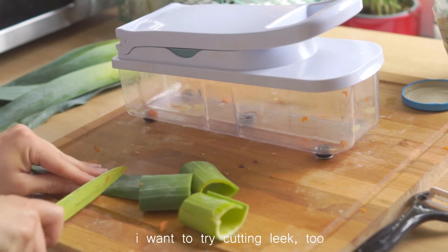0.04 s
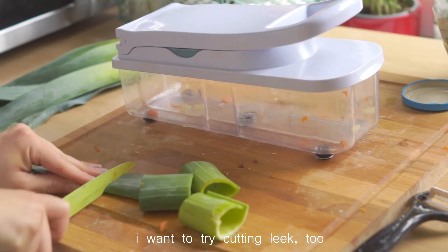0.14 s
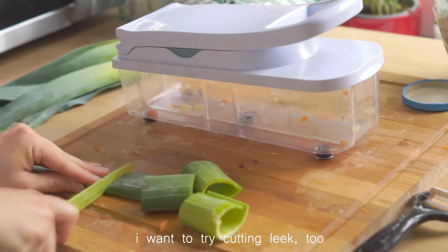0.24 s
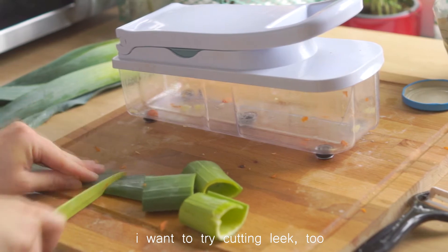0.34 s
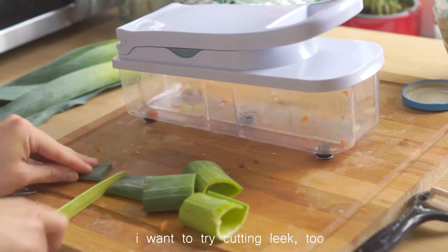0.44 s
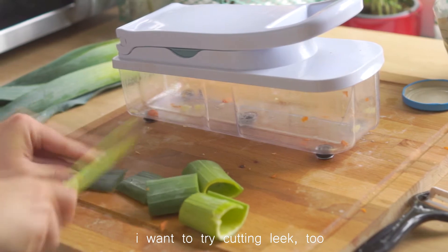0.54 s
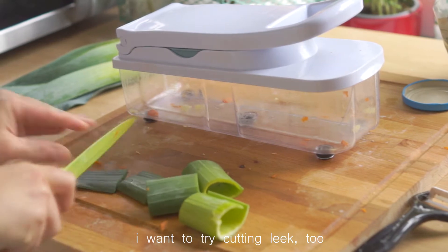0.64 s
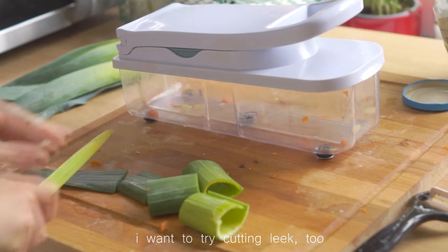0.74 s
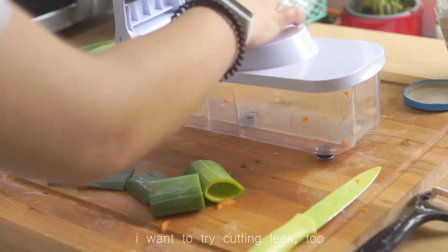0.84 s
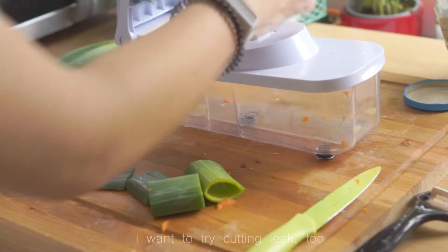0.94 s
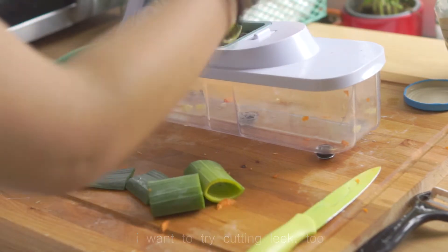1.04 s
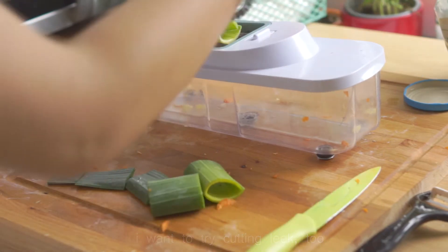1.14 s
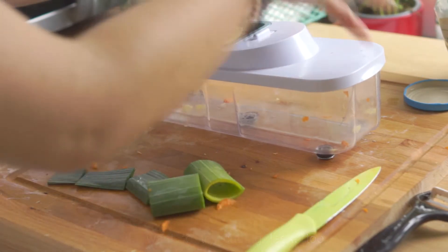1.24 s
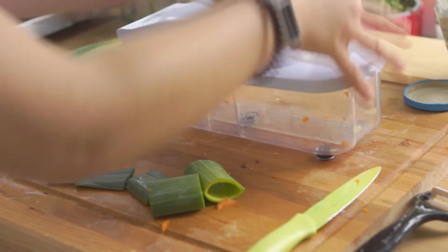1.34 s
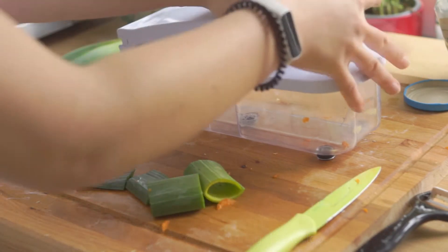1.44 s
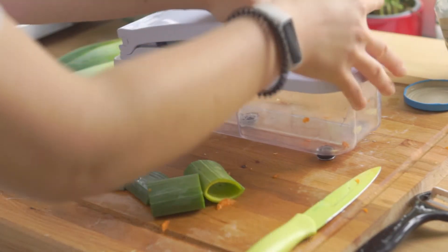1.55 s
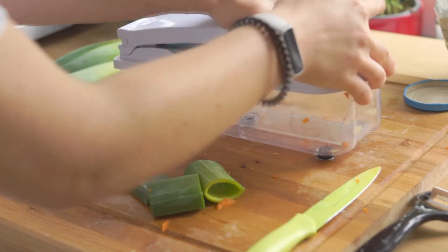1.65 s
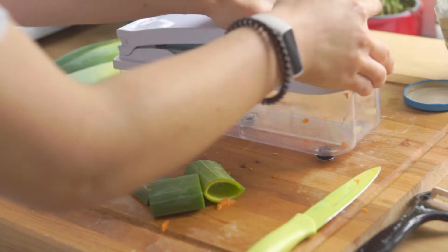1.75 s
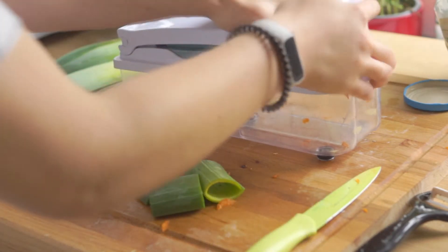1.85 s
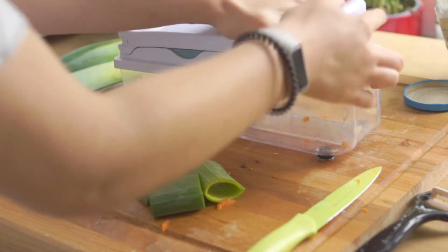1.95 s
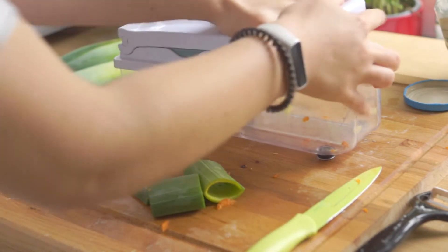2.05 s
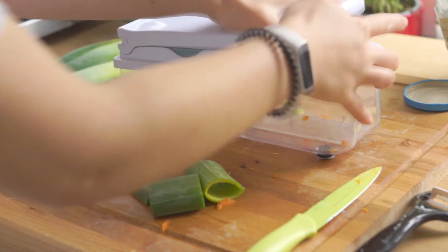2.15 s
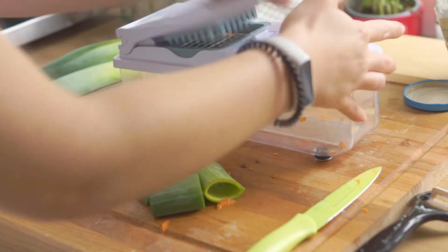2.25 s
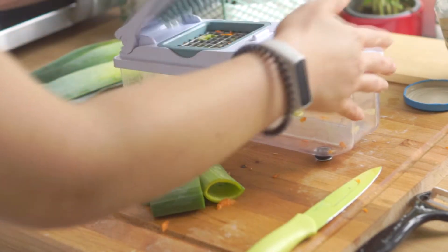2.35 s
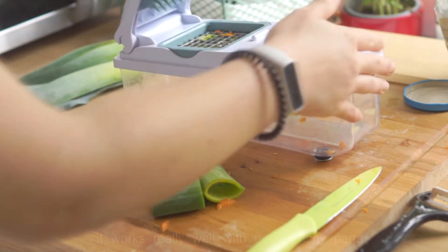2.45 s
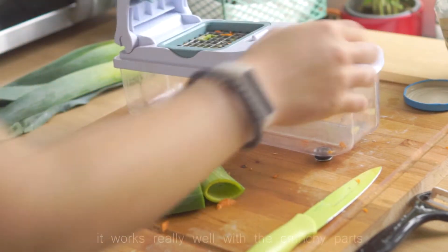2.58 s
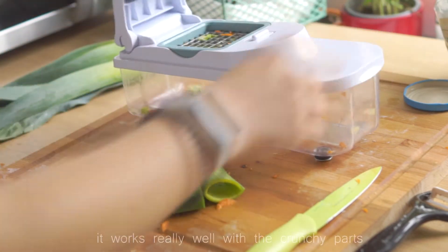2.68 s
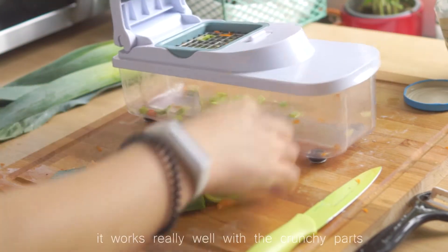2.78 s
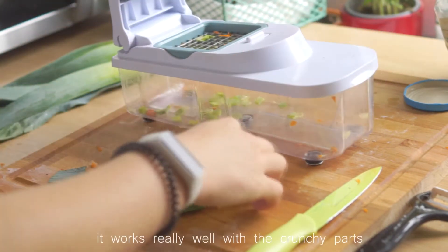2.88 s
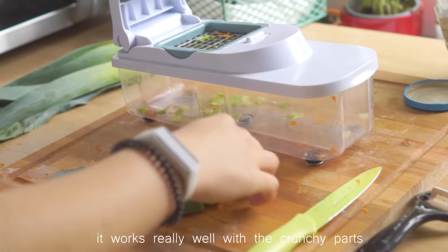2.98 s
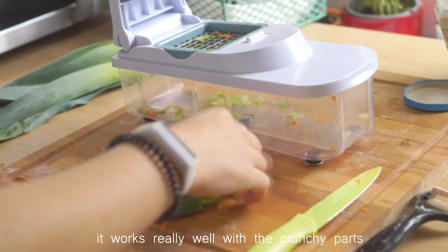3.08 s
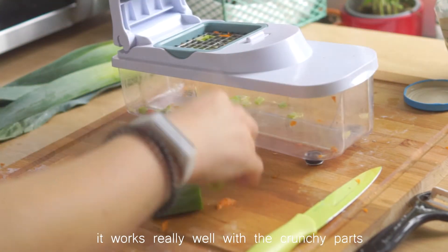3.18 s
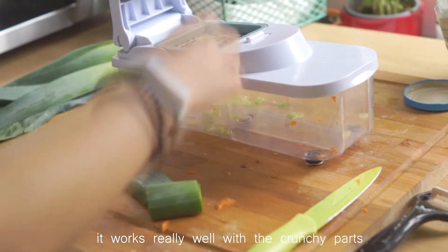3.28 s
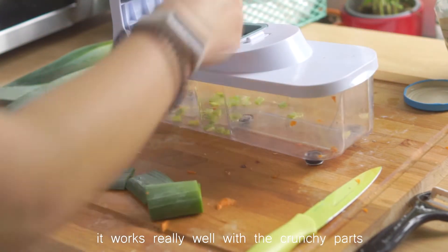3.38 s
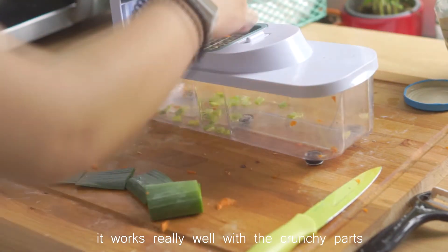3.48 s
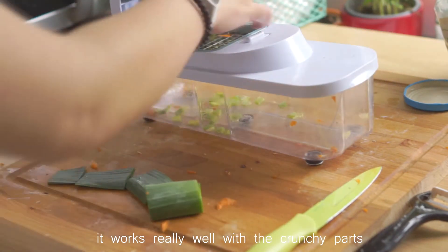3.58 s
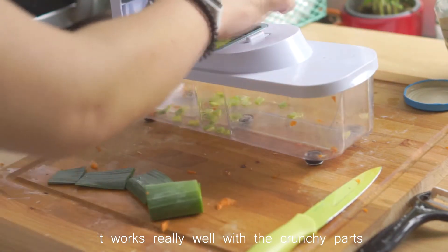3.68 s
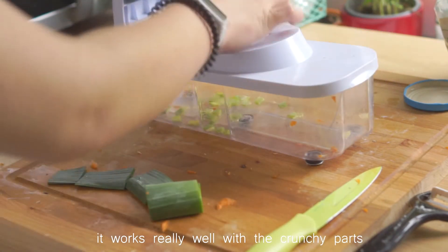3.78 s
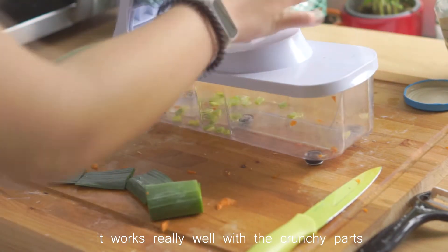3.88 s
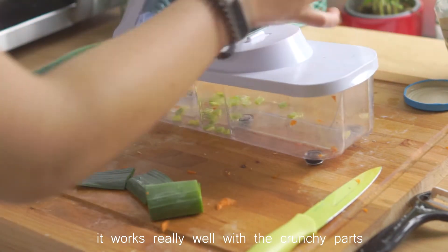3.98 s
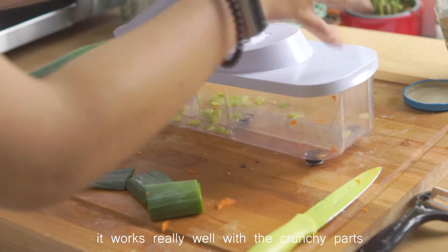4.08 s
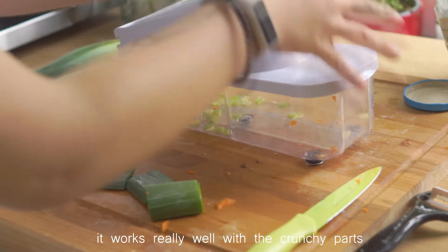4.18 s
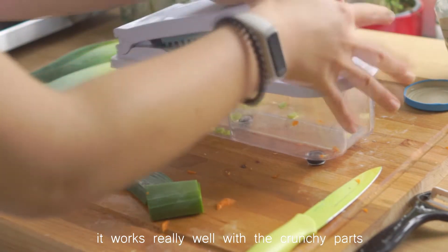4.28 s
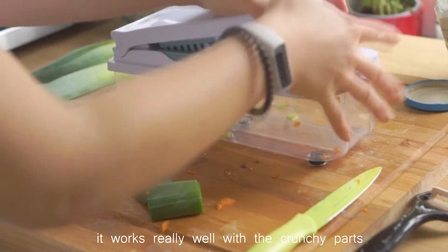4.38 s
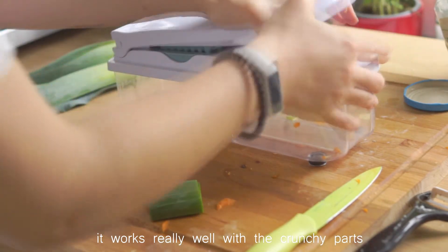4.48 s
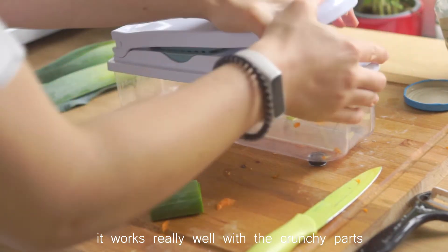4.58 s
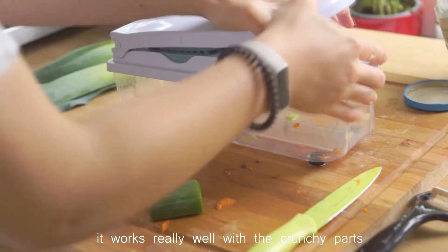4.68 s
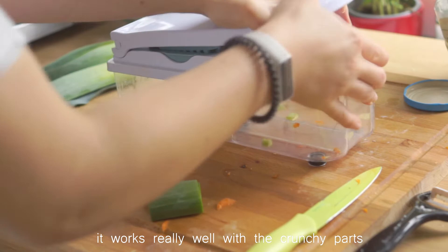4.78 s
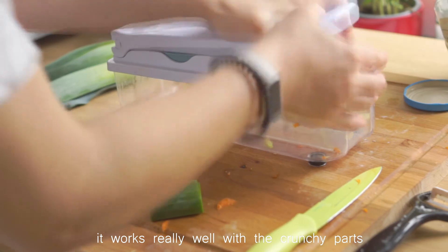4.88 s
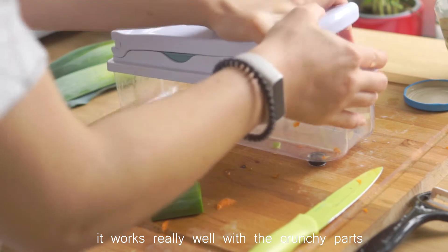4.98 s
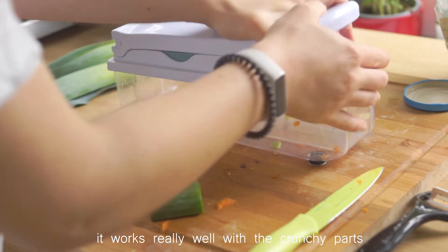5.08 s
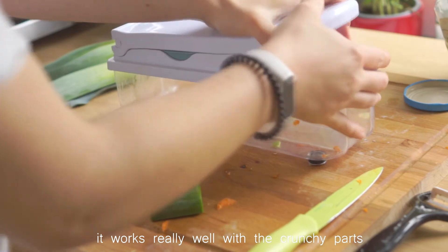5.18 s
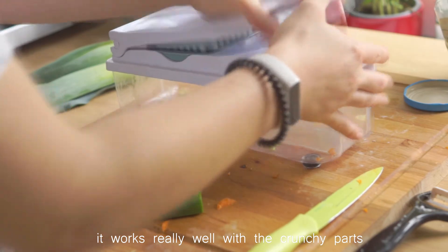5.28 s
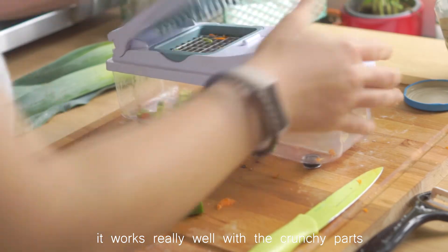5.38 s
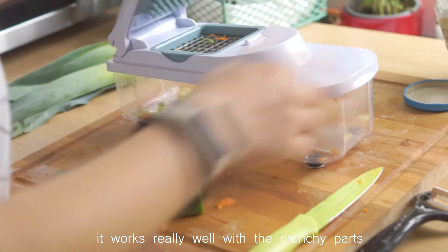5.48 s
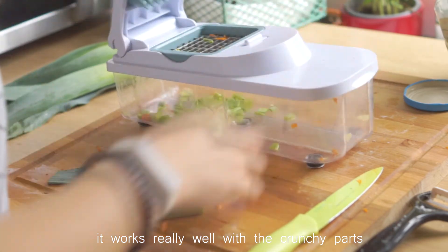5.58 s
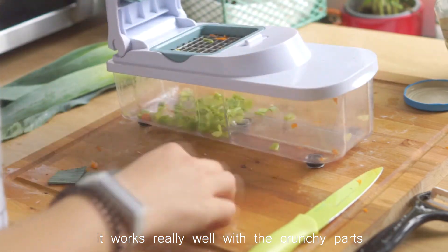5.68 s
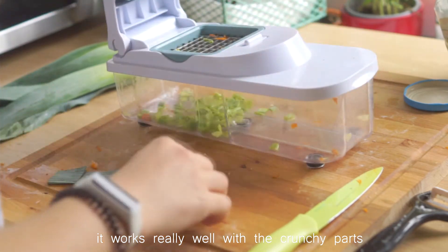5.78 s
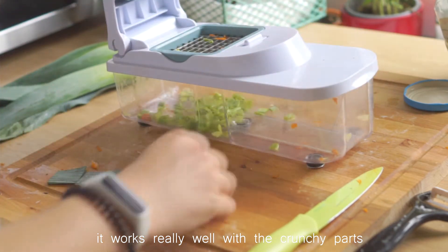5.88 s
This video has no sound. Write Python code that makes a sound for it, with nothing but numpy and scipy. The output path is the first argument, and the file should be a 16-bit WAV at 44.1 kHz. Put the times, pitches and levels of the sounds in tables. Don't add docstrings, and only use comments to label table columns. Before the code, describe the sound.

A close stereo view of a hard-walled kitchen, with quiet room and microphone hiss. From 0 to 0.6 seconds a knife makes faint, thin ticks and scrapes through leek on a wooden board, with one dull brush and tap near 0.1. A light touch comes at 0.9, then a soft slide around 1.2. At 1.35 to 1.7 the dicer presses down: dense, crisp fibre snaps mixed with hollow plastic knocks. At 1.9 the lid slams home with a hard clack, rattling box and a low counter thump, ringing off the walls. Soft taps follow near 2.4, and very faint handling from 3.6 to 4.3. The second press crunches sharply at 4.36 to 4.6, pauses, then slams at 4.91 to 5.05, its crackle lingering slightly longer. Small plastic taps and brushes at 5.4 to 5.5 fade into quiet room tone.

```python
import sys
import numpy as np
from scipy import signal
from scipy.fft import rfft, irfft
from scipy.io import wavfile
from scipy.ndimage import uniform_filter1d

SR = 44100
rng = np.random.default_rng(int(sys.argv[2]) if len(sys.argv) > 2 else 0)


def ratio(d):
    e = np.asarray(d, float) / 20
    return 10 ** e


def store_pcm(level_fs):
    pcm = np.round(np.clip(level_fs, -1, 1) * 32767).astype(np.int16)
    wavfile.write(sys.argv[1], SR, np.atleast_2d(pcm).T)


N = 261513

# frequency in Hz, level in dB.
HISS = [(12, -39), (20, 6), (48, -8.5), (96, 0), (139, 0), (197, -3.5), (286, -4), (393, -7), (461, -22),
        (705, -7), (9800, -17.5), (10600, -124), (11500, -36), (15000, -96), (22000, -120)]
# frequency in Hz, decay t60 in seconds, tail level in dB,
# left-right likeness from 0 to 1.
KITCHEN = [(60, 0.98, -12, 1), (250, 0.12, -3.5, 0.46), (1000, 0.4, -2, 0.18), (4170, 0.43, 0, 0.092),
           (11100, 0.28, -0.5, 0.011)]
# frequency in Hz, level in dB per Hz.
SNAP_SPECTRUM = [(180, -8.5), (300, -20.5), (624, -9.5), (705, -8), (809, -16), (1020, -12), (2780, -14),
                 (10500, -22), (11500, -47), (15000, -92), (22000, -120)]
# frequency in Hz, width in Hz, level in dB.
SHELL_RESONANCES = [(400, 330, -2.5), (720, 15, 3), (1050, 500, -5.5), (1430, 190, -6), (2274, 170, -5),
                    (3840, 2000, -20)]
# frequency in Hz, level in dB, decay t60 in seconds.
BOX_MODES = [(132, 5.5, 0.12), (171, -48, 0.046), (206, -61, 0.084), (249, -22, 0.28), (251.4, 1.5, 0.34),
             (303.7, -3.5, 0.27), (352.8, 5.5, 0.2), (374, 6, 0.051), (404, -0.5, 0.27), (450, -16, 0.11),
             (497, 3, 0.083), (575, -18.5, 0.54), (619, -10, 0.24), (706.5, -3, 0.17), (856, -30, 0.16),
             (846, 7, 0.015), (1008, 9.5, 0.022), (1094, -23, 0.14), (1345, 2.5, 0.053), (1600, -14, 0.036),
             (1480, -73, 0.036)]
# start in seconds, level in dB,
# fall t60 in seconds, strongest pitch in Hz.
FLECKS = [(0.05, -56.5, 0.12, 2270), (0.084, -45, .2, 2700), (0.293, -51.5, 0.062, 2940),
          (0.343, -51.5, 0.094, 9300), (0.348, -61.5, 0.23, 1610), (0.389, -57.5, 0.2, 3200),
          (0.487, -57, 0.18, 3060), (0.569, -62, 0.13, 3500), (3.190, -86, .05, 3500),
          (3.721, -62, .03, 3050), (3.919, -68, 0.28, 1520)]
# start in seconds, level in dB, fall t60 in seconds.
TOUCHES = [
    (0.105, -42.5, 0.08),
    (0.888, -54.5, 0.11),
    (1.216, -56.5, 0.33),
    (2.37, -53, 0.095),
    (2.390, -66, 0.069),
    (3.62, -67, 0.98),
    (4.065, -55, 0.056),
    (5.401, -55, 0.098),
    (5.488, -54, 0.15),
]
# start in seconds, level in dB, rise in seconds,
# fall t60 in seconds, strongest pitch in Hz.
CRUSHES = [(0.072, -35.5, 0.025, 0.026, 5830), (1.313, -45.5, 0.013, 0.3, 1200),
           (1.350, -21, 0.0095, 0.035, 1100), (1.372, -16.5, 0.013, 0.065, 2700),
           (1.403, -23, 0.019, 0.047, 1120), (1.440, -60, 0.011, 0.09, 1140),
           (1.5022, -24.5, 0.00063, 0.45, 3180), (1.527, -16, 0.017, 0.098, 2850),
           (1.575, -28, 0.0057, 0.028, 2180), (1.612, -20.5, 0.019, 0.048, 4540),
           (1.645, -17.5, 0.0017, 0.18, 1120), (4.362, -16.5, 0.013, 0.084, 1100),
           (4.399, -20, 0.088, 0.13, 5000), (4.445, -13.5, 0.0024, 0.063, 3580),
           (4.450, -18.5, 0.0025, 0.27, 3900), (4.474, -17, 0.017, 0.13, 1050),
           (4.591, -48, 0.013, .17, 6750), (5.685, -56, 0.0072, .03, 4200)]
# start in seconds, level in dB.
LEANS = [
    (1.23, -60),
    (4.239, -49.5),
]
# start in seconds, level in dB, dB lost per second as the piece runs out.
SLAMS = [
    (1.898, -14, 186),
    (4.914, -16, 32),
]
# delay in seconds, level in dB, rise in seconds, fall t60 in seconds,
# strongest pitch in Hz.
SLAM_PARTS = [
    (-.021, -15, 0.0067, 0.61, 3170),
    (0, 1, 0.0032, .22, 3700),
    (.032, 1.5, .02, 0.32, 800),
]
# start in seconds, level in dB, favoured mode in Hz,
# rattle t60 in seconds.
TAPS = [(0.109, -22, 838, 0.3), (0.889, -32, 585, 0.039), (1.173, -41.5, 335, .1), (1.214, -29.5, 490, 1),
        (2.392, -32, 367, 0.18), (2.449, -38, 400, .03), (3.604, -49, 450, 0.083), (3.722, -43, 238, 0.052),
        (4.062, -43.5, 450, 0.17), (4.261, -41, 524, 0.58), (5.402, -27.5, 310, 0.0097),
        (5.447, -35.5, 1100, .02), (5.469, -36, 404, 0.13), (5.490, -35, 400, 0.037),
        (5.535, -43.5, 380, 0.03)]
# start in seconds, level in dB, favoured mode in Hz,
# rattle t60 in seconds.
BLOWS = [(1.356, -18.5, 285, 0.028), (1.380, -16, 510, 0.016), (1.409, -18.5, 278, 0.034),
         (1.532, -19, 250, 0.9), (1.642, -2.5, 248, 0.02), (1.700, -7, 243, 0.15),
         (1.896, -2.5, 756, 0.002), (1.901, -8, 326, 0.1), (1.946, -11.5, 366, 0.2),
         (1.968, -6.5, 410, 0.26), (2.031, -25, 450, 0.14), (4.377, -17, 273, 0.13),
         (4.447, -17, 250, .033), (4.502, -12, 250, .035), (4.9127, -6.5, 1000, 0.019),
         (4.920, -12.5, 257, 0.066), (4.926, -12.5, 410, 0.06), (4.941, 0, 720, 0.094),
         (4.979, -7, 413, 0.032), (5.049, -15.5, 410, 0.21)]
# fullest swing in seconds, rms level in dB, fall t60 in seconds.
THUMPS = [(0.14, -54.5, 0.51), (0.42, -67, .5), (0.6, -68, .3), (0.89, -60.5, .8), (1.205, -55, 0.45),
          (1.37, -54.5, .9), (1.46, -46.5, .2), (1.688, -26.5, 0.17), (1.953, -18, 0.056),
          (2.06, -44, 0.17), (2.16, -43.5, 0.37), (2.289, -40.5, .2), (2.42, -54.5, 0.61),
          (2.65, -58.5, 1.2), (2.93, -54.5, 0.13), (3.46, -69, 0.16), (3.77, -60, 0.45), (4.11, -60, .45),
          (4.533, -26.5, 0.19), (4.76, -53, 0.13), (4.931, -37, .3), (4.98, -20.5, 0.035),
          (5.07, -37, 0.027), (5.148, -43, 0.47), (5.303, -50.5, 0.55), (5.51, -60, 2.4)]


def add(track, s, sound):
    i = round(s * SR)
    track[..., i:i + sound.shape[-1]] += sound[..., :N - i]


def rms_one(x):
    return x / np.sqrt(np.mean(x ** 2) + 1e-20)


def slow_noise(size):
    once = uniform_filter1d(rng.standard_normal(N), size=size)
    return rms_one(uniform_filter1d(once, size=size))


def at_hz(points, hz, column=1):
    points = np.array(points)
    return np.interp(np.log(np.clip(hz, 1, 10400)), np.log(points[:, 0]), points[:, column])


def ring(x, hz, t60):
    r, w = ratio(-60 / (t60 * SR)), 2 * np.pi * hz / SR
    return signal.lfilter([0, np.sin(w)], [1, -2 * r * np.cos(w), r * r], x + 1e-18)


def resonance(x, hz, width_hz):
    r, w = np.exp(-np.pi * width_hz / SR), 2 * np.pi * hz / SR
    return signal.lfilter([(1 - r * r) / 2, 0, (r * r - 1) / 2], [1, -2 * r * np.cos(w), r * r], x)


def low_pass(x, hz):
    return signal.sosfilt(signal.butter(2, hz, fs=SR, output="sos"), x)


def high_pass(x, hz, order=2):
    return signal.sosfilt(signal.butter(order, hz, "high", fs=SR, output="sos"), x)


def bands(white):
    edges = 22 * 2 ** np.arange(0, 9.6, .5)
    for k, (low, high) in enumerate(zip(edges, edges[1:])):
        sos = signal.butter(2, [low, high], "band", fs=SR, output="sos")
        mid, side = signal.sosfilt(sos, white[k % 2])
        yield np.sqrt(low * high), mid, side


def spread(hz, mid, side):
    alike = np.clip(at_hz(KITCHEN, hz, column=3), 0, 1)
    return np.sqrt(1 + alike) * mid + np.sqrt(1 - alike) * side * [[1], [-1]]


def swell(s, db, t60, still_db=-76, rise_s=0.038, hold_s=0.026):
    coarse = np.arange(0, N + 64, 64)
    t = coarse / SR - s
    climb_db = max(db - still_db, 6) * np.maximum(-t - hold_s, 0) / rise_s
    fall_db = 60 * np.maximum(t - hold_s, 0) / t60
    return np.interp(np.arange(N), coarse, ratio(db - climb_db - fall_db))


def air(hiss_db=-58, rustle_db=-58.5, shake_db=0.5, shake_t60_s=0.37, shake_over_db=-37):
    steady, rustle = 0, 0
    for hz, mid, side in bands(rng.standard_normal((2, 2, N))):
        pair = spread(hz, mid, side)
        steady = steady + ratio(at_hz(HISS, hz)) * pair
        rustle = rustle + ratio(-12 * abs(np.log2(hz / 330))) * pair
    shaken = sum(swell(s, db + shake_db, shake_t60_s) for s, db, _ in THUMPS if db > shake_over_db)
    return ratio(hiss_db) * rms_one(steady) + (ratio(rustle_db) + shaken) * rms_one(rustle)


def bursts():
    rows = []
    for s, db, t60, hz in FLECKS:
        rows.append((s, db, 0.087 * t60, t60, 10.5, hz))
    for s, db, t60 in TOUCHES:
        rows.append((s, db, 0.01, t60, -6.5, 1100))
    for s, db in LEANS:
        rows.append((s, db, 0.047, 1.1, -1.5, 1200))
    for s, db, rise, t60, hz in CRUSHES:
        bright_db = -2 - 0.47 * (db + 24)
        rows.append((s, db, rise, t60, bright_db, hz))
    for s, db, loss_db_s in SLAMS:
        for delay, part_db, rise, t60, hz in SLAM_PARTS:
            part_db = db + part_db - loss_db_s * max(delay, 0)
            rows.append((s + delay, part_db, rise, t60, -0.5, hz))
    return sorted(rows)


def snapping(per_s=7000, uneven_db=3.0, clump_db=1.47):
    heights = ratio(uneven_db * rng.exponential(1, N))
    snaps = heights * rng.choice([-1, 1], N) * (rng.random(N) < per_s / SR)
    snaps = snaps * ratio(clump_db * slow_noise(200))
    hz = np.arange(N // 2 + 1) * SR / N
    snaps = irfft(rfft(snaps) * ratio(at_hz(SNAP_SPECTRUM, hz)), N)
    shell = sum(ratio(db) * resonance(snaps, f, width) for f, width, db in SHELL_RESONANCES)
    return rms_one(snaps + shell)


def crunch(tilt_hz=1800, peak_db=5, peak_share=0.37):
    snaps = snapping()
    out, t = np.zeros(N), np.arange(SR // 2) / SR
    events = bursts()
    starts = rng.integers(0, N - len(t), len(events))
    for (s, level_db, rise, t60, bright_db, peak_hz), start in zip(events, starts):
        burst = snaps[start:start + len(t)]
        burst = ratio(-bright_db) * low_pass(burst, tilt_hz) - ratio(bright_db) * high_pass(burst, tilt_hz)
        burst = burst + ratio(peak_db) * resonance(burst, peak_hz, peak_share * peak_hz)
        envelope = np.minimum(t / rise, 1) * ratio(-60 * np.maximum(t - rise, 0) / t60)
        add(out, s, ratio(level_db - 1.5) * envelope * burst)
    return high_pass(out, 230, order=4)


def hollow(fibres, drive_db=-52):
    modes = sum((-1) ** k * ratio(db) * ring(fibres, hz, t60) for k, (hz, db, t60) in enumerate(BOX_MODES))
    return ratio(drive_db) * modes


def kitchen(x, build_s=0.0068):
    t = np.arange(int(.9 * SR)) / SR
    tail = 0
    for hz, mid, side in bands(rng.standard_normal((2, 2, len(t)))):
        t60 = at_hz(KITCHEN, hz)
        decay = ratio(at_hz(KITCHEN, hz, column=2) - 60 * t / t60) / np.sqrt(t60 * SR / 14)
        tail = tail + spread(hz, mid, side) * decay
    tail = tail * np.minimum(t / build_s, 1)
    return signal.fftconvolve(x[None], tail, axes=1)[:, :N]


def strike(noise, rattle_t60, rattle_db=-3):
    t = np.arange(len(noise)) / SR
    force = ratio(rattle_db - 60 * t / rattle_t60) * noise / np.sqrt(rattle_t60 * SR / 14)
    force[0] += 1
    return t, force


def knocks(contact_db=-13, db_per_octave=30, low_cut_hz=140):
    events = sorted(BLOWS + TAPS)
    shake, out = rng.standard_normal((len(events), SR // 2)), np.zeros((2, N))
    lags = np.round(.00013 * SR * rng.standard_normal(len(BOX_MODES))).clip(-60, 60).astype(int)
    for (s, level_db, spot_hz, rattle_t60), noise in zip(events, shake):
        t, force = strike(noise, rattle_t60)
        size = int(SR / np.clip(265 + spot_hz, 150, 4000))
        push = np.zeros(len(t))
        push[:size] = np.sin(np.arange(size) / size * 2 * np.pi) * np.hanning(size)
        soft = np.hanning(size * 3 // 4 + 3)
        force = np.convolve(force, soft / soft.sum())[:len(t)]
        force = np.diff(force, prepend=0)
        blow = ratio(contact_db) * np.array([push, push])
        for (hz, db, t60), lag in zip(BOX_MODES, lags):
            near_db = db - db_per_octave * abs(np.log2(hz / spot_hz))
            mode = ratio(near_db) * ring(force, hz, t60) * SR / (2 * np.pi * hz)
            late = np.array([[max(lag, 0)], [max(-lag, 0)]])
            blow = blow + np.pad(mode, (64, 64))[64 + np.arange(len(t)) - late]
        add(out, s, ratio(level_db) * blow)
    return high_pass(out, low_cut_hz)


def boom(mode_hz=67.4, wander=0.043, apart_rad=0.11):
    drift = slow_noise(2000)
    level = np.max([swell(*row) for row in THUMPS], axis=0)
    phase = 2 * np.pi * np.cumsum(mode_hz * (1 + wander * drift)) / SR
    return np.sqrt(2) * level * np.sin(phase + apart_rad * np.array([[1], [-1]])) * ratio([[1.1], [-1.1]])


def scene():
    fibres = ratio(1.5) * crunch()
    fibres = fibres + hollow(fibres)
    box = ratio(-3.5) * knocks()
    direct = fibres * ratio([[-.4], [.4]]) + box
    reverb = kitchen(fibres + ratio(-6.5) * box.mean(axis=0))
    return direct + reverb + boom() + air()


def roll_off(x):
    return signal.sosfilt(signal.butter(12, 11960, fs=SR, output="sos"), x)


def record(dry):
    limit_db, squeeze, release_db_s, sense_s = -22, 0.24, 70, 0.0025
    t = np.arange(N) / SR
    pole = np.exp(-1 / (sense_s * SR))
    power = signal.lfilter([1 - pole], [1, -pole], np.mean(dry ** 2, axis=0))
    level_db = 10 * np.log10(power + 1e-12)
    cut_db = squeeze * np.maximum(level_db - limit_db, 0)
    cut_db = np.maximum.accumulate(cut_db + release_db_s * t) - release_db_s * t
    dip_db = -11 * np.exp(-((t - .836) / 0.0028) ** 2)
    rounded = 0.66 * np.tanh(dry * ratio(dip_db - cut_db) / 0.87)
    top_cut = signal.ellip(10, .3, 62, 11020, fs=SR, output="sos")
    mix = signal.sosfilt(top_cut, rounded)
    return roll_off(mix)


dry = scene()
out = record(dry)
store_pcm(out)
```